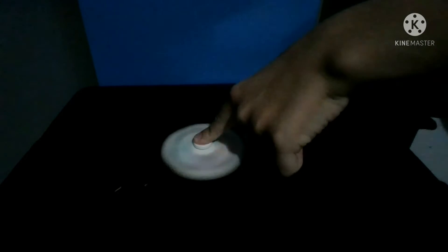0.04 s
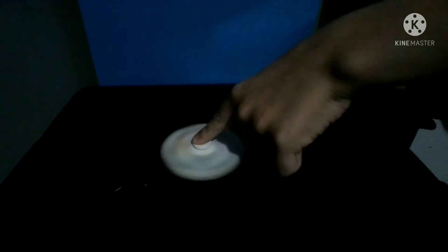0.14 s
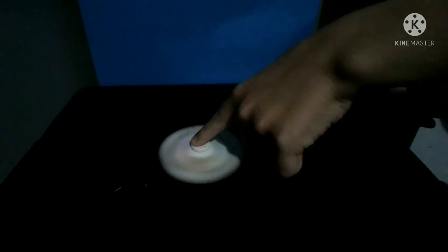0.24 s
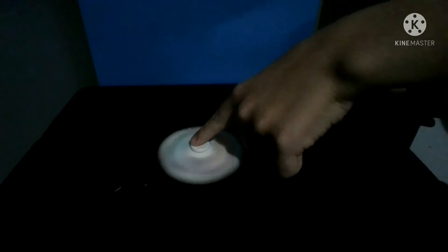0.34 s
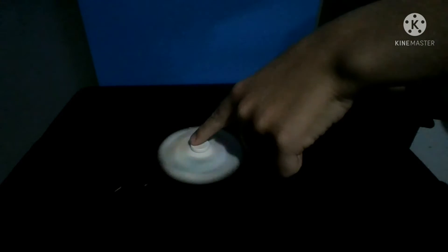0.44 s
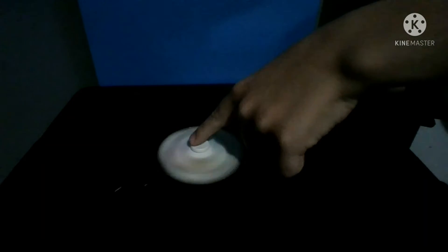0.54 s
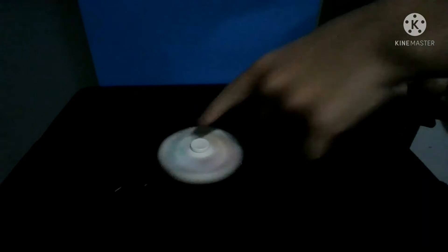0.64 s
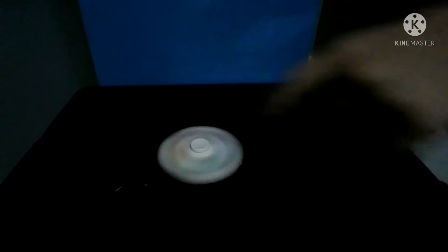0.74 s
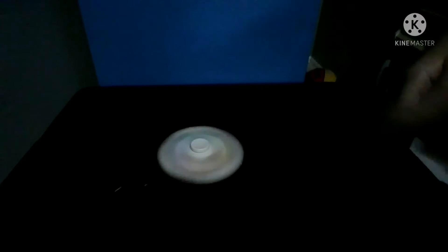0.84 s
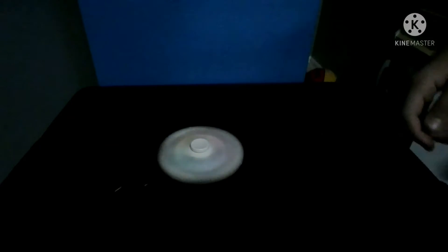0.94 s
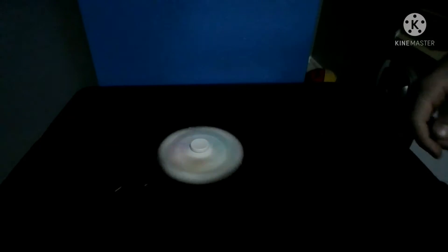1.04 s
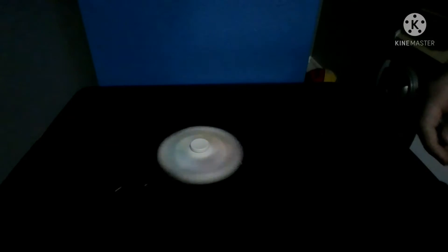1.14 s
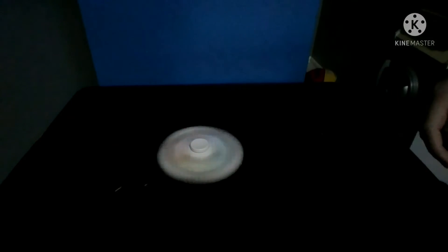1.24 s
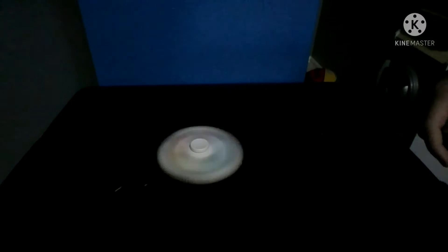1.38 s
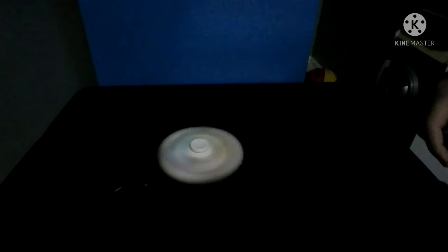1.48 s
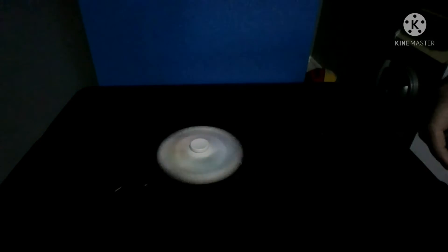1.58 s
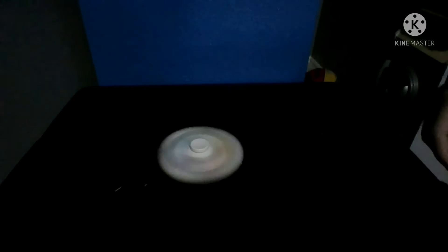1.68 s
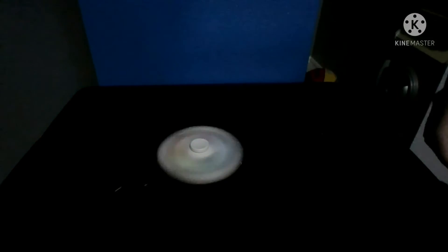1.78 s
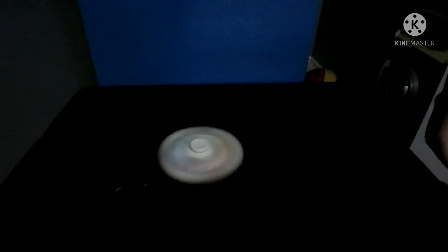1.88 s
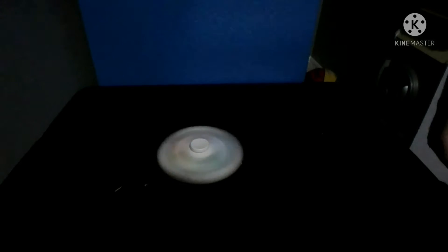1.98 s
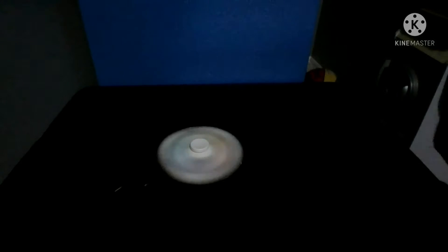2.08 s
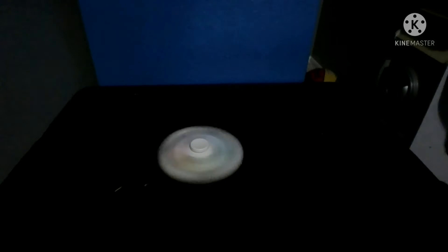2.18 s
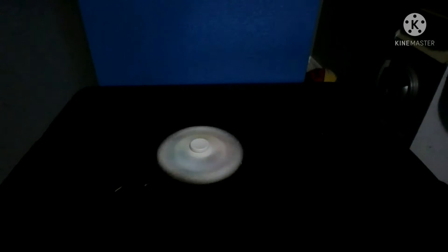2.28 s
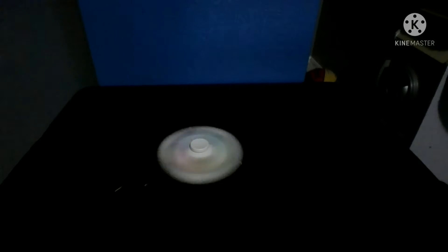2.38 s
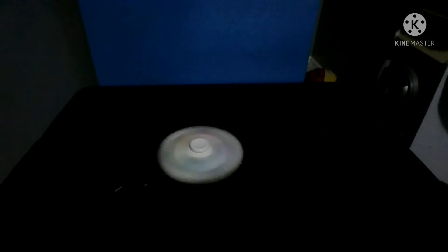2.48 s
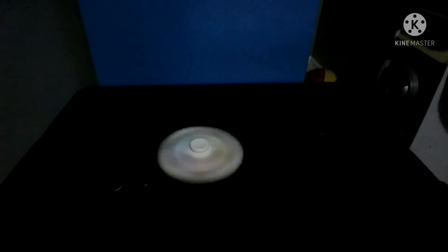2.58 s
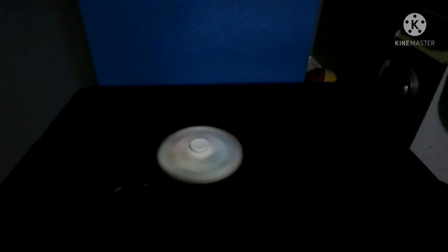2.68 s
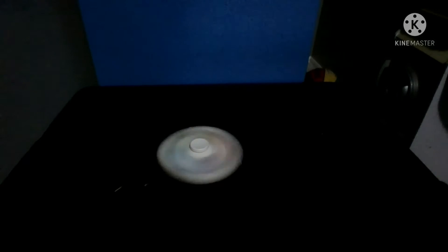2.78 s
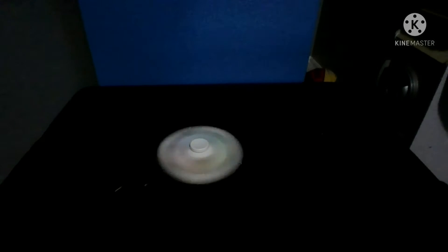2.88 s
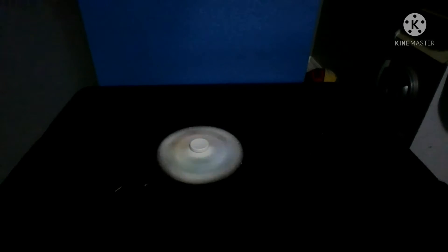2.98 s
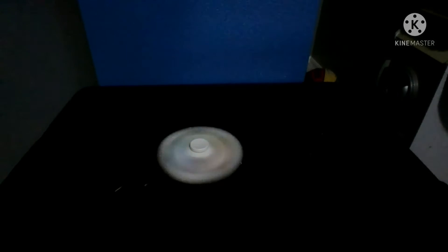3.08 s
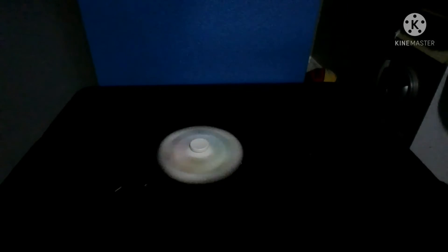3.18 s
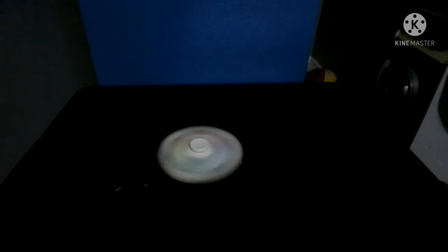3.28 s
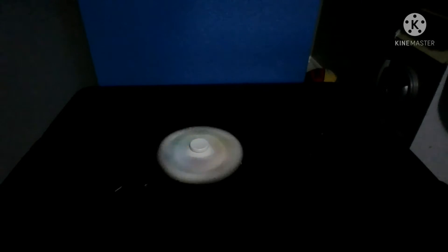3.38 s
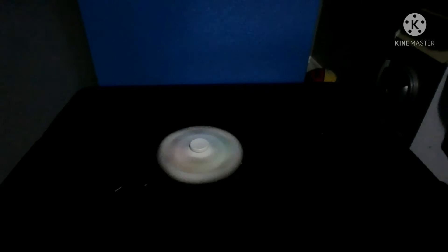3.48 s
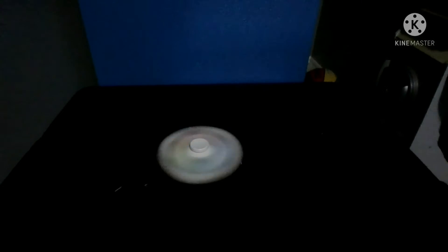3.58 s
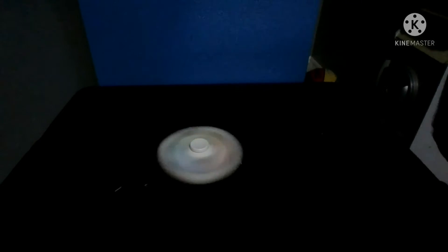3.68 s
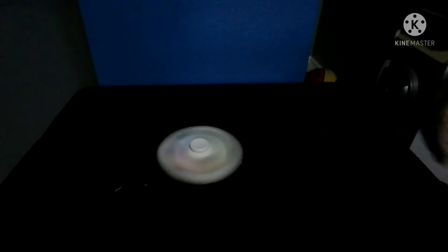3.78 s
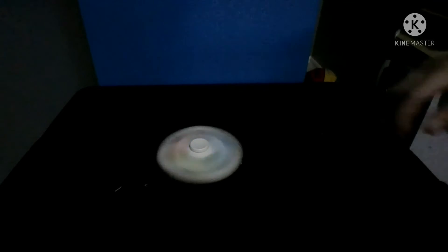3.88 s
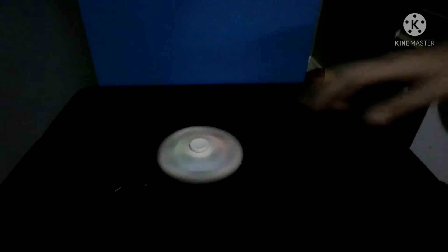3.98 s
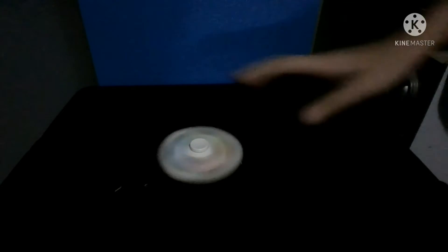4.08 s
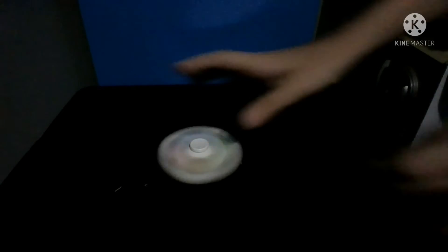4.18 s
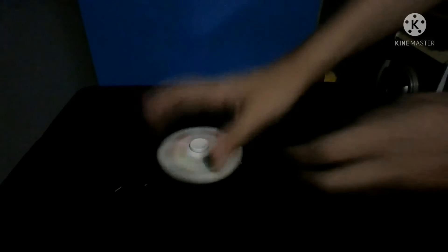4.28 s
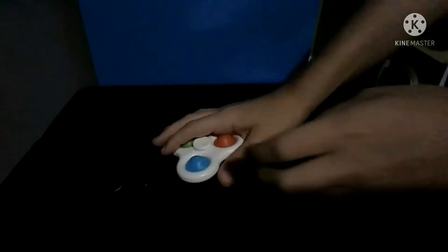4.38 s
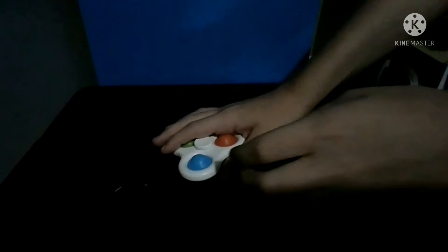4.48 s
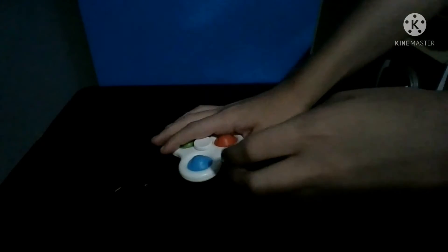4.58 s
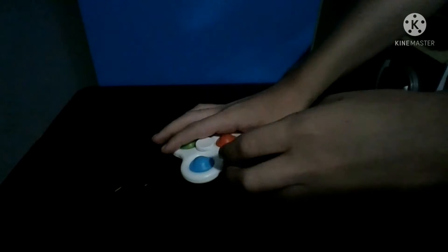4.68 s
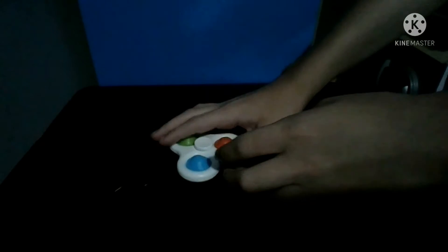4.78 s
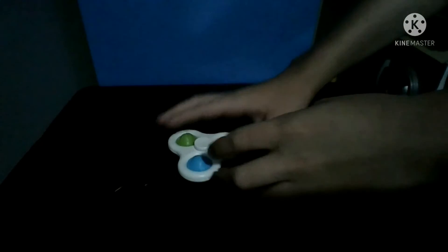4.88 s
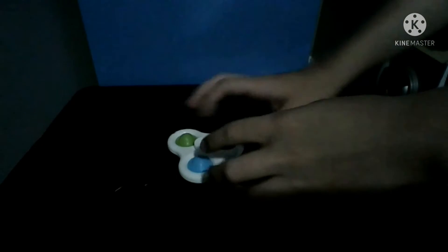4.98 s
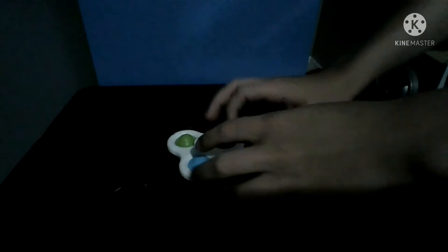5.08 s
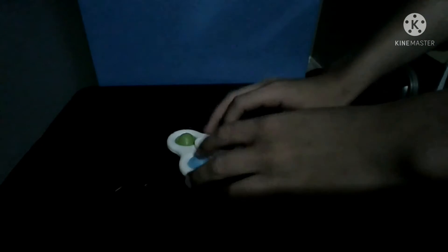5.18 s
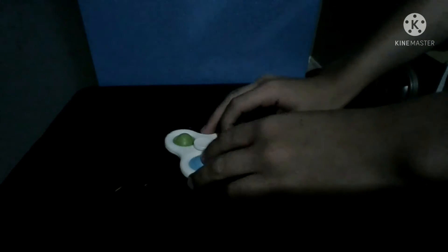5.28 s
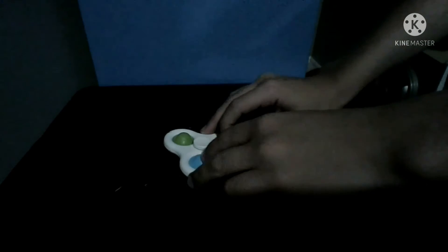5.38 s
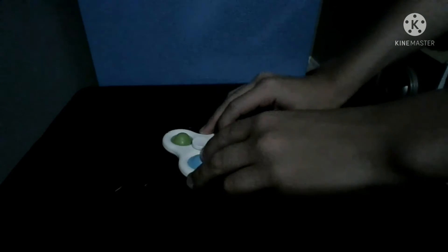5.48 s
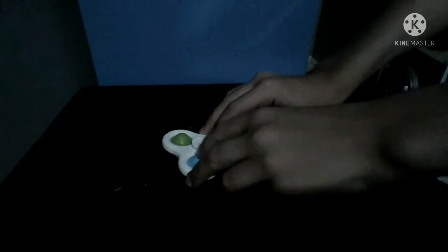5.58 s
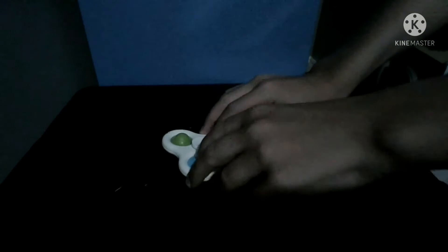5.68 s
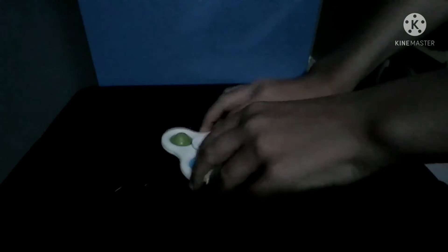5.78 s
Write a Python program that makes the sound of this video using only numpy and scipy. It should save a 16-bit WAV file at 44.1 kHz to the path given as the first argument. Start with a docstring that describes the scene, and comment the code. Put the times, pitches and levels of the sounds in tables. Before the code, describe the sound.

In a quiet room with a faint low hum, a plastic finger spinner whirs on a wooden table close to a phone microphone. Its dry bearing rattles in dense tiny knocks with a wavering low undertone. After about four and a half seconds a hand stops it with a sharp double clack and thump, then fingers shift it with faint ticks, skin rumble and a tiny scrape.

```python
"""A quiet room with two low hums; on its wooden tabletop, close to a phone, a plastic spinner whirs.
Its dry ball bearing rattles in dense tiny knocks, noise forces that ring damped modes of the toy and the table.
A finger lifts off the hub early on; later a hand stops the toy with a double clack, taps and thumps,
and fingers shift it about with faint ticks, a rising scrape and a rumble of skin on wood."""
import sys
import numpy as np
from scipy import signal
from scipy.fft import rfft, irfft
from scipy.io import wavfile
from scipy.ndimage import uniform_filter1d

SR = 44100
rng = np.random.default_rng(int(sys.argv[2]) if len(sys.argv) > 2 else 0)


def int16_out(signal):
    """Quantize to a 16-bit WAV file."""
    q = np.round(np.clip(np.atleast_2d(signal).T, -1, 1) * 32767)
    wavfile.write(sys.argv[1], SR, q.astype(np.int16))


def gain_from_decibels(decibels):
    """Convert decibel values to linear amplitude factors."""
    exponent = np.asarray(decibels, float) / 20
    return 10 ** exponent


N = 257486
T = np.arange(N) / SR
STOP_S = 4.504  # the hand has stopped the toy

# deep modes of the tabletop: mode_hz, width_hz, height_db
TABLE_LOW = [(158, 12, 0), (222, 20, 0), (275, 28, -1), (328, 24, 1), (415, 26, -10)]


def level(x, db):
    """Scale to an rms level."""
    return x * gain_from_decibels(db) / np.sqrt(np.mean(x ** 2))


def unit(shape):
    """Scale to unit energy."""
    return shape / np.sqrt(np.sum(shape ** 2, axis=-1, keepdims=True))


def through(force, response):
    """Play a force through an impulse response."""
    return signal.fftconvolve(force, response)[:N]


def filtered(x, order, hz, kind="low"):
    """Butterworth filter."""
    return signal.sosfilt(signal.butter(order, hz, kind, fs=SR, output="sos"), x)


def tone(hz):
    """Sine that follows a moving pitch."""
    return np.sin(2 * np.pi * np.cumsum(hz) / SR)


def walk(rate_hz):
    """Random levels held 1 / rate_hz s and slewed twice; spread near 0.4."""
    held = int(SR / rate_hz)
    steps = np.repeat(rng.standard_normal(N // held + 1), held)
    return 0.51 * uniform_filter1d(uniform_filter1d(steps, held), held)[:N]


def swells(events, rise_db_s, fall_db_s):
    """Gain that climbs to each event's level and dies away after it."""
    gain = np.zeros(N)
    for s, db in events:
        below_db = np.where(T < s, rise_db_s * (s - T), fall_db_s * (T - s))
        gain += gain_from_decibels(db - below_db)
    return gain


def ring(modes, lowest_hz=41.2, grip_hz=0., alternate=False, tilt_db=0.):
    """Unit-energy response of damped modes; a grip widens them, and little radiates below lowest_hz."""
    t = np.arange(SR // 2) / SR
    response = np.zeros(len(t))
    for k, (hz, width_hz, db) in enumerate(modes):
        # far from the point of contact, neighbouring modes start in opposite directions
        sign = (-1) ** (k * alternate)
        tilted_db = db + tilt_db * np.log2(hz / modes[0][0])
        decay = np.exp(-np.pi * (width_hz + grip_hz) * t)
        # the factor width_hz makes dB the height of the free resonance
        response += sign * gain_from_decibels(tilted_db) * width_hz * decay * np.sin(2 * np.pi * hz * t)
    radiation = signal.cheby1(6, 1, lowest_hz, "high", fs=SR, output="sos")
    return unit(signal.sosfilt(radiation, response))


def room():
    """Low rumble and microphone hiss as shaped noise, with two steady hums."""
    # spectrum of the air, before scaling to the total level: freq_hz, density_db (per Hz)
    spectrum = [(15, -31.5), (25, -5.5), (55, -6.5), (91, -3.5), (297, -12), (445, -20), (684, -26),
                (1380, -28), (2300, -34.5), (11200, -37.5), (15500, -33)]
    # steady tones: pitch_hz, level_db (rms)
    hums = [(46.9, -54), (59.15, -59)]
    hz, db = np.transpose(spectrum)
    f = np.fft.rfftfreq(N, 1 / SR) + 1
    curve = gain_from_decibels(np.interp(np.log(f), np.log(hz), db))
    sound = level(irfft(rfft(rng.standard_normal(N)) * curve, N), -54.5)
    for pitch_hz, hum_db in hums:
        sound += np.sqrt(2) * gain_from_decibels(hum_db) * np.sin(2 * np.pi * (pitch_hz * T + rng.random()))
    return sound


def echo(near):
    """Walls return a decaying noise tail whose treble dies first; little bass comes back."""
    t60_s, treble_t60_s, echo_db = 0.21, 0.15, -16.5
    t = np.arange(SR // 2) / SR
    noise = filtered(rng.standard_normal(len(t)), 2, 600., "high")
    low = filtered(noise, 2, 4500.)
    treble = noise - low
    tail = low * gain_from_decibels(-60 * t / t60_s) + treble * gain_from_decibels(-60 * t / treble_t60_s)
    tail *= np.clip(t / 0.004 - 1, 0, 1)  # silent for 4 ms, full at 8 ms
    return gain_from_decibels(echo_db) * through(near, unit(tail))


def blows(events, response):
    """Single impulses ring a response up to the given peak levels."""
    force = np.zeros(N)
    for s, peak_db in events:
        force[int(s * SR)] = gain_from_decibels(peak_db) / np.abs(response).max()
    return through(force, response)


def thumps():
    """The hand's weight meets the table and rings the panel's deepest modes."""
    # landings of the hand: start_s, peak_db
    landings = [(0.259, -33.5), (4.486, -24.5), (4.504, -20), (5.49, -46)]
    # deepest modes of the panel: mode_hz, width_hz, height_db
    panel = [(86, 7, 2), (129, 6, -3), (158, 8, -5), (226, 14, -14)]
    return blows(landings, ring(panel, 53.0, alternate=True))


def rub():
    """Skin on wood: noise rings the deep table modes once the toy is held, swelling as hands land or slide."""
    # landings and slides: start_s, level_db
    slides = [(4.53, -50.5), (4.935, -45.5), (5.02, -54.5), (5.1, -61), (5.25, -62), (5.35, -59),
              (5.5, -69), (5.61, -65), (5.83, -52)]
    rest_db = -69
    strength = gain_from_decibels(rest_db) + swells(slides, rise_db_s=250, fall_db_s=95)
    force = rng.standard_normal(N) * strength * (T > STOP_S)
    return through(force, ring(TABLE_LOW, alternate=True))


def scrape():
    """A fingertip drags over the toy: slow noise rides on a rising sine."""
    # one drag: start_s, end_s, from_hz, to_hz, width_hz, level_db (of the noise, 1 dB under its rms)
    drag = (5.17, 5.275, 1850, 2380, 200, -68)
    start_s, end_s, from_hz, to_hz, width_hz, db = drag
    along = np.clip((T - start_s) / (end_s - start_s), 0, 1)
    grain = level(uniform_filter1d(rng.standard_normal(N), int(SR / width_hz)), db + 1)
    swell = np.sqrt(np.sin(np.pi * along ** 1.4).clip(0))
    return grain * swell * tone(from_hz + (to_hz - from_hz) * along)


def taps():
    """A fingernail or an arm of the toy taps bare wood and rings its modes."""
    # taps: start_s, peak_db
    hits = [(4.5042, -8), (4.5058, -18.5), (5.4897, -19), (5.5025, -41)]
    # modes of the bare wood: mode_hz, width_hz, height_db
    wood = [(290, 44, -6), (630, 70, -13), (824, 25, -9.5), (905, 30, 0), (1100, 70, -5), (1460, 55, -6),
            (1745, 65, -10), (2050, 120, -14), (2330, 42, -1), (2550, 270, -9), (2880, 160, -9),
            (3000, 250, -8), (3400, 220, -6), (3914, 220, -12), (4500, 400, -19), (5200, 400, -27),
            (7500, 1500, -33), (11500, 2500, -38)]
    return blows(hits, ring(wood, 150., alternate=True))


def spinning():
    """Gain of the spin: full, then down to nothing in the last 9.4 ms before the stop."""
    return np.clip((STOP_S - T) / 0.0094, 0, 1)


def rocking():
    """The toy rocks on its seat and drives the table's first mode as a wavering tone."""
    # rocks: start_s, level_db (rms)
    rocks = [(0.01, -36), (0.27, -48), (0.47, -40.5), (0.89, -46.5), (1.17, -48), (1.42, -43),
             (1.72, -43.5), (2.03, -41.5), (2.1, -44), (2.6, -58), (2.91, -62), (3.17, -41), (3.29, -51),
             (3.39, -45.5), (3.74, -51), (4.15, -54), (4.22, -54), (4.47, -45)]
    wavering_hz = TABLE_LOW[0][0] + 7.08 * walk(25)
    strength = swells(rocks, rise_db_s=307, fall_db_s=205)
    return np.sqrt(2) * tone(wavering_hz) * strength * spinning()


def cap_landings(rate_hz=260., uneven=.3, spread_db=3.):
    """The cap lands on its seat in a rough rhythm, some landings harder than others."""
    gap, hard = rng.standard_normal((N // 50, 2)).T
    at = np.cumsum(SR / rate_hz * np.exp(uneven * gap)).astype(int)
    inside = at < N
    landings = np.zeros(N)
    landings[at[inside]] = gain_from_decibels(spread_db * hard[inside].clip(-2, 1.8))
    return landings


def rattle(count, rate_hz=3000., spread_db=2.0, hardest_db=11.5, smooth_db=-5.0, surge_db=1.5):
    """Balls knock their races at random over rolling noise; the cap hops; the play surges and sways.
    Every part feels the same knocks, each from its own direction."""
    # by part, from table low to bearing: hop level against the rattle [dB], decay of one landing [s], sway [dB]
    hop_db = [-16., -16., -12., -5.5, -5.]
    hop_s = [0.00043, 0.00037, 0.0004, 0.00042, 0.00099]
    sway_db = [1., 1., 0.8, 0.7, 0.8]
    hop_top_hz = 3600  # the soft landing drives table and toy only below this; the bearing feels all
    chance = rng.random((2, N))
    size = gain_from_decibels(np.minimum(-spread_db * np.log(chance[1] + 1e-9), hardest_db))
    direction = np.sign(rng.standard_normal((count, N)))
    balls = level((chance[0] < rate_hz / SR) * size, 0) * direction
    rolling = level(rng.standard_normal((count, N)), smooth_db)
    force = level(balls + rolling, 0)
    landings, surge, sway = cap_landings(), walk(40), walk(12)
    for k in range(count):
        hops = through(landings, np.exp(-T[:SR // 100] / hop_s[k])) * rng.standard_normal(N)
        if k < count - 1:
            hops = filtered(hops, 4, hop_top_hz)
        play = gain_from_decibels(surge_db * surge + sway_db[k] * sway)
        force[k] = level((force[k] + level(hops, hop_db[k])) * play, 0)
    return force


def knocks():
    """Every knock as time, chatter time and level in table low, table middle, hub, body and bearing."""
    # the balls jolt in their races while it spins: start_s, bearing_db, table_low_db, body_db
    jolts = [(0.208, -30, -52, -39), (0.23, -36, -55, -44), (0.324, -25, -56, -44), (0.4, -24.5, -52, -32),
             (0.4257, -21.5, -45, -37), (0.562, -24, -51, -33), (0.686, -23, -36, -44.5),
             (0.7975, -25, -47, -43), (1.1885, -21, -33, -31), (1.361, -29, -55, -50),
             (1.4201, -27, -37, -35), (1.6277, -24, -51, -36), (1.6913, -22.5, -32.5, -40),
             (1.896, -25, -51, -49), (2.024, -27, -33, -34), (2.378, -43, -53, -28),
             (2.4094, -33, -44, -30), (2.429, -28.5, -48, -36), (2.7168, -26, -37, -43),
             (2.7803, -25, -50, -32), (3.1537, -22.5, -34, -43), (3.298, -23.5, -36, -31),
             (3.6077, -26.5, -53, -41), (3.677, -27.5, -38, -43), (3.74, -25, -32, -55),
             (4.147, -26, -29, -47), (4.1986, -28.5, -31.5, -36)]
    # a jolt's levels against its bearing level: table_middle_db, hub_db
    jolt_share = [-17.5, -33]
    # the arms hit the stopping hand: start_s, chatter_s, bearing_db, table_low_db, hub_db, body_db
    clacks = [(4.4903, 0.0006, -13, -30, -34, -23), (4.493, 0.0016, -22, -46, -44, -40),
              (4.5039, 0.00054, -7, -39, -26.5, -15.5), (4.506, 0.0017, -7.5, -40.5, -34, -18.5),
              (4.5097, 0.002, -12.5, -22.5, -33, -28), (4.514, 0.00096, -29.5, -32, -38, -25)]
    # loose parts tick as fingers shift the toy: start_s, chatter_s, bearing_db, table_middle_db, hub_db, body_db
    ticks = [(4.673, 0.00082, -48, -65, -76.5, -74), (4.8377, .001, -57, -51.5, -62.5, -60),
             (4.911, 0.0061, -54, -72, -74, -72), (4.9328, 0.0007, -42, -46, -58, -45),
             (4.9368, 0.0029, -35.5, -52, -64, -57), (4.9439, 0.0014, -42, -43.5, -62, -37),
             (4.970, 0.0011, -56, -70, -72, -70), (4.974, 0.00042, -48, -67, -67, -44),
             (4.994, 0.0012, -48, -67, -54, -50), (5.031, 0.00055, -59, -64, -66, -66),
             (5.056, 0.00058, -53, -59, -67, -54.5), (5.086, 0.00045, -58, -66, -72, -62),
             (5.102, 0.00057, -60, -63, -70, -70), (5.264, .0007, -53, -62, -60, -67),
             (5.3400, 0.0012, -48, -63, -66, -54), (5.344, 0.0011, -47, -61, -45, -60),
             (5.349, 0.00086, -36.5, -60, -47, -43), (5.355, .0025, -43, -62, -52, -64),
             (5.3658, 0.00065, -46, -59, -53, -61), (5.37, .003, -57, -62, -58, -68),
             (5.385, .003, -53.5, -66, -70, -73), (5.4895, 0.0032, -40.5, -66, -66, -54)]
    jolt_s = 0.002
    clack_middle_db, tick_low_db = -18, -6.5  # against the bearing level
    middle_share, hub_share = jolt_share
    rows = []
    for s, bearing, low, body in jolts:
        rows.append((s, jolt_s, low, bearing + middle_share, bearing + hub_share, body, bearing))
    for s, chatter_s, bearing, low, hub, body in clacks:
        rows.append((s, chatter_s, low, bearing + clack_middle_db, hub, body, bearing))
    for s, chatter_s, bearing, middle, hub, body in ticks:
        rows.append((s, chatter_s, bearing + tick_low_db, middle, hub, body, bearing))
    return np.transpose(rows)


def knock_forces():
    """Knocks chatter as short noise bursts, but reach the table through the cap's seat as a smooth push."""
    # length of the push on table low and table middle [s]
    push_s = [0.0041, 0.00014]
    # energy of a knock is its level held this long, by part: table low, table middle, hub, body, bearing [s]
    held_s = [0.00015, 0.00093, 0.0026, 0.0022, 0.00065]
    when, chatter_s, *knock_db = knocks()
    t = np.arange(SR // 50) / SR
    at = (when * SR).astype(int)[:, None] + np.arange(len(t))
    chatter = unit(rng.standard_normal((len(when), len(t))) * t * np.exp(-t / chatter_s[:, None]))
    forces = np.zeros((len(held_s), N))
    for k, force in enumerate(forces):
        shape = chatter
        if k < len(push_s):
            shape = unit(np.sin(np.pi * np.minimum(t / push_s[k], 1)) ** 2)[None]
        strength = gain_from_decibels(knock_db[k]) * np.sqrt(held_s[k] * SR)
        np.add.at(force, at, shape * strength[:, None])
    return forces


def spinner():
    """Rattle and knocks drive each part at its own strength; under a finger or hand the parts ring shorter."""
    # modes of table middle, hub, body and bearing: mode_hz, width_hz, height_db
    table_middle = [(578, 52, -1), (650, 70, -8), (750, 40, -10), (895, 45, -8), (1028, 28, -9),
                    (1150, 120, -17), (1280, 100, -17), (1462, 50, 0), (1620, 120, -15), (1880, 60, -19),
                    (2100, 80, -17)]
    hub = [(2350, 50, -3), (2500, 150, -5), (2680, 180, -2), (2860, 150, -4.5)]
    body = [(3040, 70, -2), (3155, 130, -1.5), (3305, 90, -1), (3410, 90, -3), (3495, 55, -3.5),
            (3675, 110, -8.5), (3950, 350, -11.5), (4400, 200, -10.5), (4790, 200, -16.5)]
    bearing = [(5770, 1000, -3.5), (6140, 110, -13.5), (7730, 1400, -3.5), (8980, 1170, 3.5),
               (10670, 1100, 9), (11850, 1200, 1.5), (13200, 2700, -1), (14700, 1600, -6), (15280, 180, 5)]
    # stages of the spin: pressed until, finger lifting, cap loose on its seat, settled [s]
    stage_s = [.16, .33, .43, .58]
    # rattle by part: pressed_db, lifting_db, loose_db, settled_db, fading_db_per_s
    rattle_levels = [(-43, -57, -51, -43, 0.27), (-42.5, -51.5, -50, -47, 0.34),
                     (-46, -53.5, -47.5, -49, 1), (-50.5, -42, -38, -38, 0.37),
                     (-39, -38.5, -34, -37.5, 1.23)]
    # the finger eases off the hub: start_s, end_s
    lift_s = [0.17, 0.27]
    # by part: radiates poorly below [Hz], widening of gripped modes [Hz], lies away from the point of contact
    lowest_hz = [140, 535, 2280, 2960, 5000]
    grip_hz = [15, 290, 27, 320, 400]
    far = [True, False, True, True, False]
    # by part: share of the hold left once the hand eases, from 0 to 1
    relaxed_grip = [0.11, 0.08, 0.99, 0.055, 0.12]
    # by part: tilt of the modes under the gripping hand, and under one fingertip on the cap [dB per octave]
    grip_tilt_db = [2, 8, -56, -6.5, -2]
    press_tilt_db = [-2, 1, -57, -13, 10]
    grip_s, ease_s = 4.488, 4.5  # the hand takes hold, then eases at once
    drift = 0.0085  # the modes shift by up to this share as the toy wobbles

    parts = [TABLE_LOW, table_middle, hub, body, bearing]
    turning = rattle(count=len(parts)) * spinning()
    knocking = knock_forces()
    pressed = np.clip((lift_s[1] - T) / (lift_s[1] - lift_s[0]), 0, 1)
    wobble = np.clip(0.18 + 0.58 * walk(5), 0, 1)
    sound = rocking()
    for k, modes in enumerate(parts):
        *stage_db, fading_db_s = rattle_levels[k]
        force = turning[k] * gain_from_decibels(np.interp(T, stage_s, stage_db) - fading_db_s * T) + knocking[k]
        gripped = (T > grip_s) * np.where(T > ease_s, relaxed_grip[k], 1)
        free = force * np.sqrt(1 - gripped - pressed)
        shifted = [(hz * (1 + drift), width_hz, db) for hz, width_hz, db in modes]
        for share, free_modes in ((1 - wobble, modes), (wobble, shifted)):
            sound = sound + through(free * share, ring(free_modes, lowest_hz[k], alternate=far[k]))
        for share, tilt_db in ((pressed, press_tilt_db[k]), (gripped, grip_tilt_db[k])):
            held = ring(modes, lowest_hz[k], grip_hz[k], far[k], tilt_db)
            sound = sound + through(force * np.sqrt(share), held)
    return sound


def scene():
    """Toy and hands with their echo, over the room."""
    hands = thumps() + rub() + scrape() + taps()
    near = hands + spinner()
    return (room() + echo(near) + near)[None]


def roll_off(x):
    """The treble ends steeply here."""
    return signal.sosfilt(signal.butter(12, 16650, fs=SR, output="sos"), x)


def record(dry):
    """The phone cuts the top steeply above 15440 Hz."""
    steep = signal.ellip(10, .5, 45, 15440, fs=SR, output="sos")
    mix = signal.sosfilt(steep, dry)
    return roll_off(mix)


dry = scene()
out = record(dry)
int16_out(out)
```